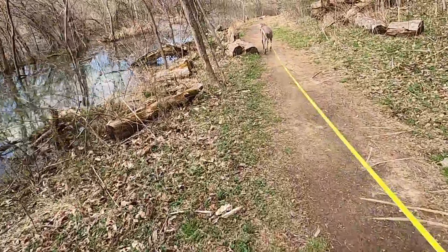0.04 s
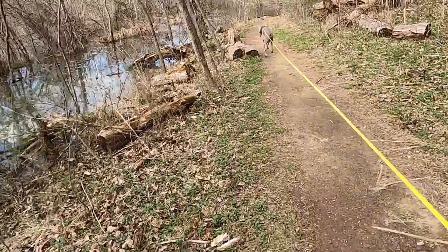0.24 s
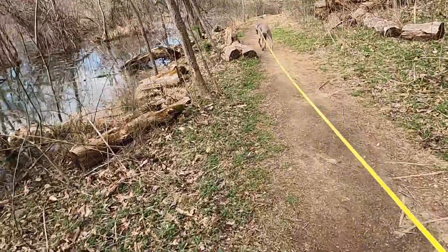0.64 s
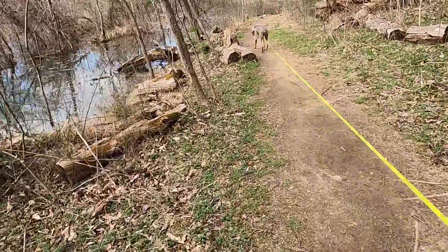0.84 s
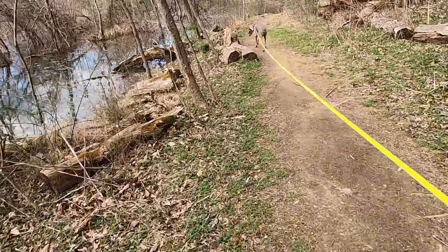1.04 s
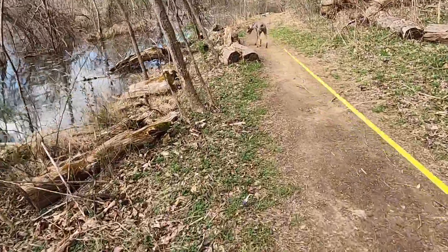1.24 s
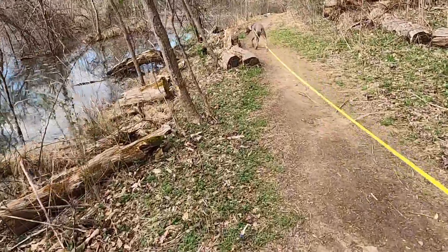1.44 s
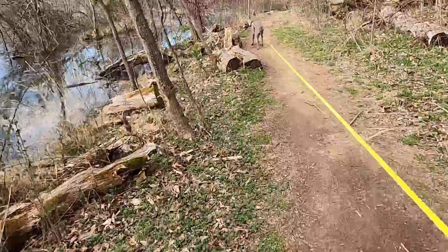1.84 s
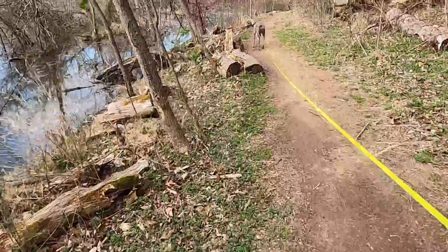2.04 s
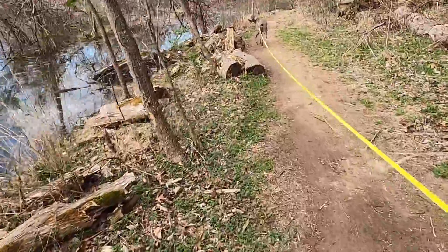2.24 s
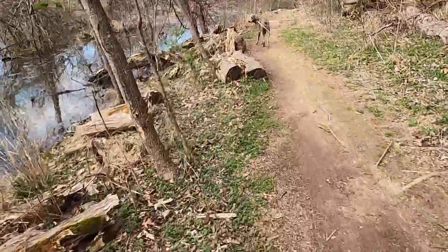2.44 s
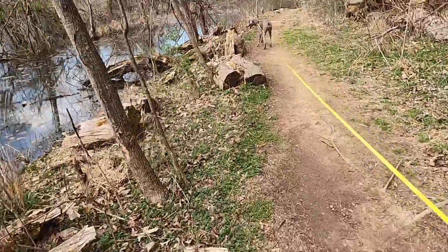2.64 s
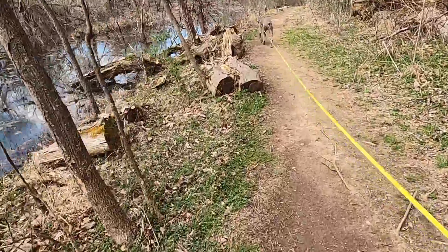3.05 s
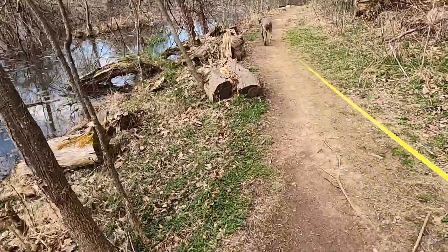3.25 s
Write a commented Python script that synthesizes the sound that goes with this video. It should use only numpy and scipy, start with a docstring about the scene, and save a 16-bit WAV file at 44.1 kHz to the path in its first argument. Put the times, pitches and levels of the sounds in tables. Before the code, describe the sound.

A toad's long pulsing trill rings close by, over twig snaps and gusty wind rumble.

```python
"""A toad trills close to the microphone in a woodland pond, its vocal sac ringing once per pulse.
A lower toad stops after two seconds, and a third trills far off. Small frogs creak in a distant
chorus, and a bird gives two thin rising chirps among the trees. On the path, steps scuff dry leaves
and snap twigs while gusts buffet the microphone."""
import sys
import numpy as np
from scipy import signal
from scipy.fft import rfft, irfft
from scipy.io import wavfile
from scipy.ndimage import uniform_filter1d

SR = 44100
rng = np.random.default_rng(int(sys.argv[2]) if len(sys.argv) > 2 else 0)


def materialize(psi):
    """Save the field psi as 16-bit PCM at rate SR to the path in sys.argv[1].

    A 1-D psi becomes a single channel; in a 2-D psi each row is a channel.
    """
    bounded = np.clip(np.atleast_2d(psi).T, -1, 1)
    quanta = np.round(bounded * 32767).astype(np.int16)
    wavfile.write(sys.argv[1], SR, quanta)


N = 149940
T = np.arange(N) / SR


def amp(db):
    """Decibels to gain."""
    return 10 ** (np.asarray(db) / 20)


def unit(x):
    """Scales to rms 1."""
    return x / np.sqrt(np.mean(x ** 2) + 1e-20)


def at(curve, s):
    """Reads a curve at the given times."""
    return np.interp(s, *np.transpose(curve)[:2])


def add(mix, s, sound):
    """Mixes a sound in at time s."""
    part = mix[max(round(s * SR), 0):][:len(sound)]
    part += sound[:len(part)]


def colour(x, spectrum, tilt_db=0):
    """Filters by a spectrum, tilted in dB per octave about 3 kHz; rms 1."""
    hz = np.fft.rfftfreq(len(x), 1 / SR) + 1
    points_hz, points_db = np.transpose(spectrum)
    db = np.interp(np.log(hz), np.log(points_hz), points_db) + tilt_db * np.log2(hz / 3000)
    return unit(irfft(rfft(x) * amp(db), len(x)))


def noise(spectrum):
    """Steady noise with the given spectrum."""
    return colour(rng.standard_normal(N), spectrum)


def swells(rows):
    """One bell-shaped swell for each row."""
    return sum(amp(db) * np.exp(-((T - s) / half) ** 2) for s, half, db in rows)


def woods_echo(x, t60):
    """Echoes off trunks and water; they shift as the microphone is carried along the path."""
    t, out = np.arange(SR // 2) / SR, np.zeros(N)
    for k in range(3):
        tail = rng.standard_normal(len(t)) * amp(-60 * t / t60) * np.minimum(t / .008, 1)
        crossfade = np.cos(np.pi * (T * 1.3 + k / 3)) * np.sqrt(2 / 3)
        out += signal.fftconvolve(x * crossfade, tail / np.linalg.norm(tail))[:N]
    return out


# ambience of the woods (frequency [Hz], level [dB])
AIR_SPECTRUM = [(100, 3.5), (300, 0.5), (550, 0), (800, -6), (1200, -5), (1700, -1), (2000, -16.5),
                (2400, -12.5), (3300, -13), (3700, -21.5), (4500, -22), (6000, -28), (8500, -32.5),
                (10000, -44.5), (12000, -61.5)]


def woodland_air(level_db=-51.5):
    """A faint, steady hush all around the pond."""
    return amp(level_db) * noise(AIR_SPECTRUM)


# small frogs in the distance (time [s], length [s], relative level [dB])
CREAKS = [(0.148, 0.48, -60.5), (0.763, 0.54, -56), (1.336, 0.28, -57.5), (1.821, 0.75, -55.5),
          (2.42, 0.54, -58.5), (2.801, .55, -56)]
# the farthest frogs, blurred into a band (frequency [Hz], level [dB])
CHORUS_SPECTRUM = [(1900, -36), (2300, -12), (2550, -3), (2720, 2), (3000, -1.5), (3250, -17),
                   (3600, -38.5), (5000, -68)]


def frog_chorus(from_hz=2700, to_hz=3026, scatter_hz=51, pulses_per_s=70, half_pulse_s=.0018):
    """Each creak is a run of pulses that climbs and swells; mostly its echo reaches the microphone."""
    out, t = np.zeros(N), np.arange(-300, 300) / SR
    pulse_shape = np.exp(-(t / half_pulse_s) ** 2)
    for s, length, db in CREAKS:
        creak = np.zeros(int(length * SR) + len(t))
        pulse_places = np.arange(0, 1, 1 / (length * pulses_per_s))
        for progress, scatter in zip(pulse_places, rng.standard_normal(200)):
            hz = from_hz + (to_hz - from_hz) * progress + scatter_hz * scatter
            swell = np.sqrt(abs(np.sin(np.pi * progress ** 1.1)))
            add(creak, progress * length, swell * pulse_shape * np.sin(2 * np.pi * (hz * t + scatter)))
        add(out, s, amp(db - 4) * unit(creak))
    return amp(-6) * out + woods_echo(out, t60=.35) + amp(-60) * noise(CHORUS_SPECTRUM)


# chirps in the trees (time [s], length [s], start [Hz], end [Hz], bend [exponent], level [dB])
CHIRPS = [(0.823, 0.028, 5180, 7620, .31, -43.5), (1.206, .037, 6250, 8100, .7, -48)]


def bird(echo_db=-9):
    """Quick upward whistles that hang briefly among the trees."""
    out = np.zeros(N)
    for s, length, start_hz, end_hz, bend, db in CHIRPS:
        progress = np.linspace(0, 1, int(length * SR))
        hz = start_hz + (end_hz - start_hz) * progress ** bend
        swell = abs(np.sin(np.pi * progress)) ** .56
        add(out, s, amp(db) * swell * np.sin(2 * np.pi * np.cumsum(hz) / SR))
    return out + amp(echo_db) * woods_echo(out, t60=.36)


# soles in leaves and heels on earth, on the path (time [s], half length [s], level [dB])
SCUFFS = [(0.049, 0.014, -49), (1.316, 0.0097, -51), (1.338, 0.12, -58.5), (1.825, 0.28, -65),
          (3, .035, -62.5), (2.41, 0.13, -53.5), (2.96, 0.025, -60.5), (3.7, 0.12, -77)]
HEELS = [(.045, 0.0094, -44), (2.283, 0.0098, -37), (2.91, 0.0055, -49), (2.978, 0.0044, -42)]
# their tone at the microphone (frequency [Hz], level [dB])
SCUFF_SPECTRUM = [(400, -1), (1500, 5.5), (2500, 2), (4500, -4), (8000, -12.5), (11000, -23), (14000, -45)]
HEEL_SPECTRUM = [(100, -15), (400, -3), (900, -10), (1800, -20.5), (4000, -33), (10000, -70)]


def footsteps(grains_per_s=10000, grain_spread_db=2):
    """Soles scuff a grainy rustle out of dry leaves, and heels thud on the earth."""
    sizes = amp(grain_spread_db * np.minimum(rng.exponential(1, N), 4))
    grains = rng.standard_normal(N) * sizes * (rng.random(N) < grains_per_s / SR)
    return colour(grains, SCUFF_SPECTRUM) * swells(SCUFFS) + noise(HEEL_SPECTRUM) * swells(HEELS)


# twigs and leaves breaking underfoot (time [s], level [dB], brightness [dB per octave])
SNAPS = [(.045, -27, -3.5), (0.167, -42, 0), (.707, -51, 7), (1.2919, -40, 7), (1.309, -33, -4),
         (1.3135, -37, 4.5), (1.3549, -30, -0.5), (1.3998, -28.5, -4), (2.358, -40, -7), (2.452, -35, 0),
         (2.476, -44.5, 19), (3.166, -46.5, 21)]
# tone of a snap (frequency [Hz], level [dB])
SNAP_SPECTRUM = [(300, -14.5), (1300, 10.5), (2800, 7), (4500, -0.5), (7000, -10), (11000, -32),
                 (14000, -37)]


def twig_snaps(snap_s=.0011, tail_db=-25, tail_s=.023):
    """Each break on the path is one sharp crack with a faint tail."""
    out, t = np.zeros(N), np.arange(SR // 20) / SR
    attack = 1 - np.exp(-t / .0001)
    decay = np.exp(-t / snap_s) + amp(tail_db) * np.exp(-t / tail_s)
    for s, db, tilt_db in SNAPS:
        crack = colour(rng.standard_normal(len(t)), SNAP_SPECTRUM, tilt_db)
        add(out, s - .0005, amp(db) * crack * attack * decay)
    return out


# wind right on the microphone: deep rumble and sharper buffeting (time [s], relative level [dB])
RUMBLE_LEVEL = [(0.0, -28.5), (0.29, -32), (0.35, -27), (0.39, -27), (0.71, -33.5), (0.75, -19),
                (0.79, -31.5), (1.14, -27.5), (1.16, -18), (1.31, -19), (1.51, -34), (1.56, -28),
                (1.66, -27), (1.74, -19), (1.81, -27.5), (2.28, -27.5), (2.31, -18.5), (3.06, -38),
                (3.11, -34.5), (3.4, -37)]
BUFFET_LEVEL = [(0, -55), (.45, -45.5), (.65, -50.5), (.95, -46.5), (1.1, -38.5), (1.165, -23.5),
                (1.245, -39.5), (1.32, -24), (1.39, -52), (1.6, -49.5), (1.72, -39.5), (2.0, -48),
                (2.25, -49), (2.32, -39), (2.45, -35), (2.52, -51), (2.84, -60), (2.89, -38.5), (2.95, -50),
                (3.4, -52)]
# tone of each (frequency [Hz], level [dB])
RUMBLE_SPECTRUM = [(10, 0), (25, -0.5), (40, 1), (70, -2), (115, -5), (170, -14.5), (260, -33.5),
                   (600, -66.5), (2000, -100)]
BUFFET_SPECTRUM = [(60, -10), (130, -3), (190, 2.5), (300, -4.5), (420, -14), (600, -21.5), (1000, -40),
                   (3000, -76.5)]
# short puffs on the microphone (time [s], half length [s], level [dB])
PUFFS = [(.75, .01, -39.5), (1.335, 0.012, -28.5), (1.95, 0.024, -36), (2.055, 0.0043, -28),
         (2.17, 0.0097, -30.5), (2.195, .008, -32.5), (2.445, 0.0083, -32.5), (2.915, 0.0027, -36)]


def wind(rumble_trim_db=-1, rumble_lumps_db=2, buffet_lumps_db=3):
    """Gusts rumble at the microphone; the strong ones break into lumpy buffeting."""
    lumps = unit(uniform_filter1d(uniform_filter1d(rng.standard_normal(N), size=1100), size=600))
    rumble_gain = amp(at(RUMBLE_LEVEL, T) + rumble_trim_db + rumble_lumps_db * lumps)
    buffet_gain = amp(at(BUFFET_LEVEL, T) + buffet_lumps_db * lumps) + swells(PUFFS)
    return noise(RUMBLE_SPECTRUM) * rumble_gain + noise(BUFFET_SPECTRUM) * buffet_gain


def toad(rate, level, pitch, start_s, pulse_s, echo_db, wander_s,
         sag_hz_per_s=10700, jitter_s=.00007, spread_db=.5):
    """The vocal sac rings once per pulse: a rounded burst of tone that sags a little in pitch."""
    beats = np.cumsum(at(rate, T)) / SR
    end_s = rate[-1][0]
    count = int(np.interp(end_s, T, beats)) + 1
    times = np.interp(np.arange(count) + np.interp(start_s, T, beats), beats, T)
    drift, jitter, accent = rng.standard_normal((count, 3)).T
    wander = unit(uniform_filter1d(uniform_filter1d(drift, size=9), size=7))
    times = times + wander_s * wander + jitter_s * jitter  # the beat is never quite even
    out = np.zeros(N)
    for s, db in zip(times, at(level, times) + spread_db * accent):
        span = slice(max(int((s - pulse_s * 2) * SR), 0), int((s + pulse_s * 2) * SR))
        t = T[span] - s
        shape = np.exp(-(2 * t / pulse_s) ** 2)
        cycles = t * (at(pitch, s) - .5 * sag_hz_per_s * t)
        out[span] += amp(db) * shape * np.sin(2 * np.pi * cycles)
    return out + amp(echo_db) * woods_echo(out, t60=.49)


# trill of the near, the lower and the far toad (time [s], rate [pulses per s])
NEAR_RATE = [(0, 43.7), (.8, 43.55), (1.0, 42.8), (1.7, 42.55), (2.93, 42.4), (3.01, 39.8), (3.2, 40.2),
             (3.4, 41)]
LOW_RATE = [(0, 41.5), (1.35, 41.5), (2.06, 40)]
FAR_RATE = [(0, 39.4), (3.4, 38.6)]
# direct sound of each at the microphone (time [s], level [dB])
NEAR_DB = [(0, -40), (.25, -35), (.9, -34), (1.3, -34), (1.6, -32.5), (1.82, -28), (2.05, -31.5),
           (2.45, -26), (2.75, -29.5), (2.9, -28.5), (3.2, -30.5), (3.4, -30.5)]
LOW_DB = [(0, -35.5), (0.249, -37.5), (.9, -33.5), (1.5, -33.5), (1.85, -36.5), (2.06, -34.5)]
FAR_DB = [(0, -64), (1.399, -53.5), (3.4, -56.5)]
# ring of each vocal sac (time [s], pitch [Hz])
NEAR_HZ = [(0, 1639), (1.5, 1674), (2.4, 1646), (3.4, 1637)]
LOW_HZ = [(0, 1508), (0.901, 1511), (1.701, 1538), (2.06, 1480)]
FAR_HZ = [(0, 1297), (3.4, 1320)]


def toads():
    """Three toads in the pond; the one nearest the microphone has the smallest share of echo."""
    near = toad(NEAR_RATE, NEAR_DB, NEAR_HZ, start_s=.0106, pulse_s=.0084, echo_db=-8, wander_s=.00046)
    low = toad(LOW_RATE, LOW_DB, LOW_HZ, start_s=.0192, pulse_s=.0063, echo_db=-.5, wander_s=.0008)
    far = toad(FAR_RATE, FAR_DB, FAR_HZ, start_s=.01, pulse_s=.014, echo_db=-2, wander_s=.00155)
    return near + low + far


def scene():
    """The pond and the woods from one microphone on the path."""
    return (toads() + frog_chorus() + bird() + footsteps() + twig_snaps() + wind() + woodland_air())[None]


def record(dry, edge_hz=11600):
    """The recorder's band limit cuts the highest treble."""
    lowpass = signal.firwin(511, edge_hz, window=("kaiser", 9), fs=SR)
    return signal.oaconvolve(dry, lowpass[None], "same")


dry = scene()
out = record(dry)
materialize(out)
```